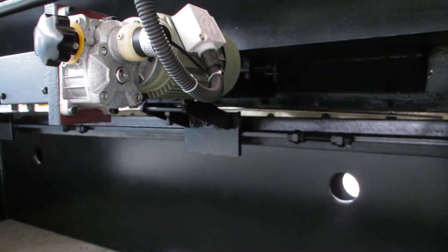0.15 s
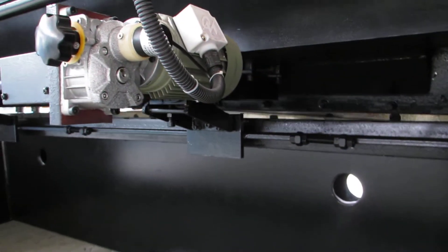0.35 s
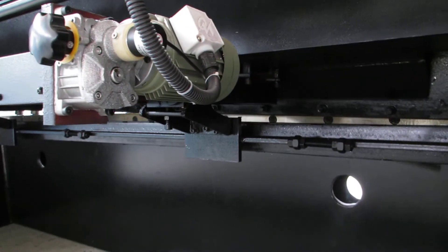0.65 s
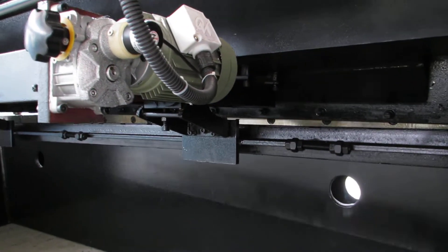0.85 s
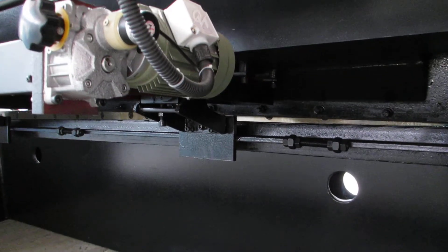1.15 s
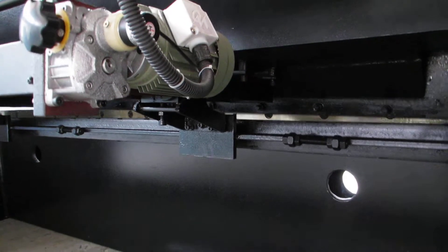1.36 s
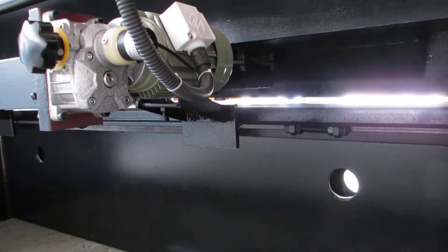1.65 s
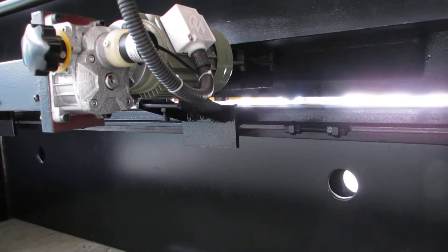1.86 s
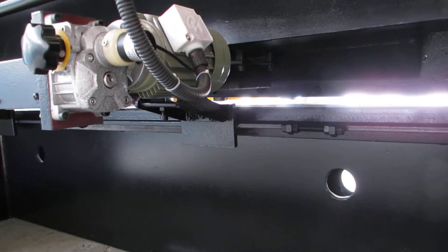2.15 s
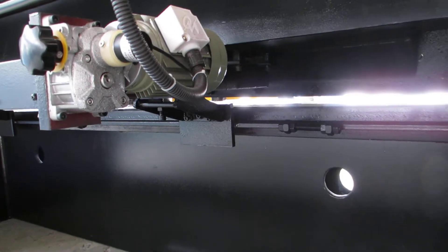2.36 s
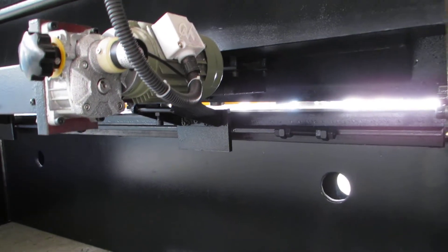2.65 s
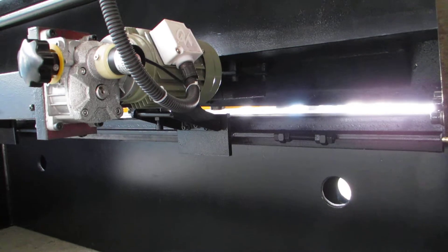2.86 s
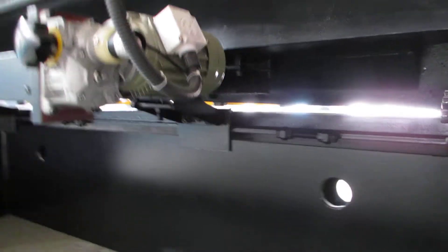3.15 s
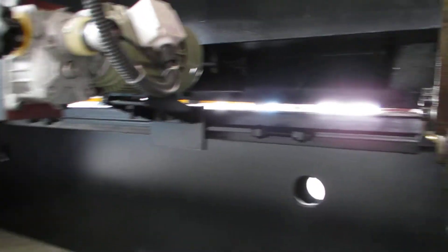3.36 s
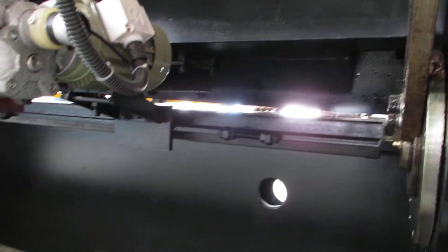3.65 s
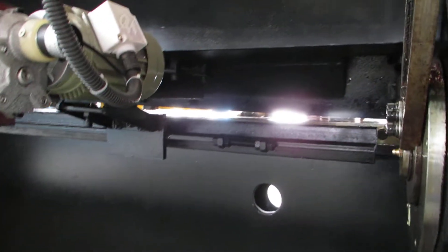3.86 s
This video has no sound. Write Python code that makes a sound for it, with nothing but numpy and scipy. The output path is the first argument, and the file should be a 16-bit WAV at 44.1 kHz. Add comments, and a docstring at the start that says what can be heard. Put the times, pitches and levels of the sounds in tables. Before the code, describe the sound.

A hydraulic shear whines over a heavy rumble with crisp ticks, breaks through with a thud, then the cut metal strip clangs and rattles in a chute; a faint motor hum remains in the hall, close stereo microphone.

```python
"""A hydraulic shear finishes its stroke. First the pump whines (wavering tones) over a heavy rumble and
a hiss (shaped noise), and the blade ticks through the sheet in short noise bursts. It breaks out with
a thud (ringing frame modes and dull noise). Then the cut strip falls, clangs (bending modes) and rattles
in the chute (noise and small clicks). The idling motor, there all along as a stack of shaft tones in
soft noise, is left humming in the hall."""
import sys
import numpy as np
from scipy import signal
from scipy.fft import rfft, irfft
from scipy.io import wavfile
from scipy.ndimage import uniform_filter1d

SR = 44100
rng = np.random.default_rng(int(sys.argv[2]) if len(sys.argv) > 2 else 0)


def generate_wav(sig):
    """Save sig (samples, or channels by samples) to the path in sys.argv[1] as 16-bit PCM at SR."""
    pcm = np.round(np.clip(np.atleast_2d(sig).T, -1, 1) * 32767).astype(np.int16)
    wavfile.write(sys.argv[1], SR, pcm)


def volts_from_decibels(level):
    """Turn decibel levels (scalar or array-like) into linear amplitude factors."""
    exponent = np.asarray(level, float) / 20
    return 10 ** exponent


N = 176400  # samples: 4 s

# A "t60" is the time in which a sound dies by 60 dB. Levels in spectra and mode lists are relative.
# Loaded pump over time: time_s, whine_db, rumble_db, cutting_hiss_db
PUMP_LOAD = [(0, -13.5, -17.5, -36.5), (.31, -12.5, -17.5, -31), (.42, -17, -19.5, -35.5),
             (.7, -17.5, -18.5, -24.5), (.86, -31, -24.5, -40), (1.02, -32, -27.5, -49.5)]
# Tones of the pump whine: multiple of the whine pitch, level_db
WHINE_TONES = [(1, -4), (1.073, -17.5), (1.348, -20)]
# Spectrum of the rumble in the frame: pitch_hz, level_db (per Hz)
RUMBLE_SPECTRUM = [(30, -38), (105, -2.5), (160, -8), (240, -2), (480, -13.5), (640, -8), (900, -15),
                   (1800, -23.5), (6000, -57)]
# Spectrum of the cutting hiss and the ticks: pitch_hz, level_db (per Hz)
HISS_SPECTRUM = [(1200, -7.5), (2500, -12), (6500, -11), (11500, -26.5), (15100, -53)]
# Blade ticks: start_s, level_db
BLADE_TICKS = [(0.2793, -26), (0.3177, -20), (0.3565, -21), (0.6405, -19.5), (0.7094, -16.5), (0.914, -33)]
# Thuds through the frame: start_s, level_db, spot_hz (modes near this pitch are struck hardest)
FRAME_THUDS = [(0.71, -14, 70), (0.749, -18.5, 146.7), (.79, -15, 135), (0.911, -26.5, 2315),
               (1.257, -29.5, 75), (1.297, -20.5, 398), (1.339, -18.5, 501), (1.389, -20, 261),
               (1.821, -37, 200)]
# Ringing modes of the frame: pitch_hz, level_db, t60_s
FRAME_MODES = [(52, 1, 0.039), (75, 0.5, 0.075), (133.6, 0, 0.47), (250.8, -0.5, 0.277), (581, -4.5, 0.081),
               (760, -17.5, .12)]
# Spectrum of the dull thump, before the struck spot tilts it: pitch_hz, level_db (per Hz)
THUMP_SPECTRUM = [(30, -3), (226, -7.5), (629, -12), (2500, -3.5), (7000, -60)]
# Blows of the falling strip: start_s, level_db, crack_db (mid-pitched part, on top of level_db), spot_hz
STRIP_BLOWS = [(1.0198, -17, 5.5, 4920), (1.0308, -13, -12, 9710), (1.048, -17.5, -13, 7340),
               (1.0892, -16.5, -14, 6406), (1.1591, -22, -18, 6111), (1.2043, -20.5, -15, 8457),
               (1.2406, -15.5, -10, 6406), (1.27, -17.5, -17, 6111), (1.3, -14, -7.5, 5730),
               (1.3341, -17.5, 1, 5202), (1.482, -25, -7, 2557), (1.499, -21.5, -2, 5802),
               (1.515, -21, -3, 4580), (1.5937, -20, -4, 6700), (1.631, -25, -7, 3830)]
# Bending modes of the strip: pitch_hz
STRIP_MODES = [2557, 3634, 3885, 4365, 4650, 4920, 5202, 5490, 5802, 6111, 6406, 6725, 7038, 7340, 7525,
               7690, 7990, 8323, 8457, 8800, 9088, 9420, 9747, 10082, 10550, 10760, 11150]
# Ringing time of the strip modes: pitch_hz, t60_s
STRIP_RING = [(2500, .4), (5000, .33), (12000, .16)]
# Spectrum of the dense chute modes, which also sets the strip modes: pitch_hz, level_db (per Hz)
CRASH_SPECTRUM = [(500, -25.5), (1200, -6), (2770, -11.5), (6900, -3.5), (11000, -10.5), (12800, -18),
                  (15100, -84.5)]
# Dying time of the chute crash: pitch_hz, t60_s
CRASH_RING = [(800, .14), (4000, .33), (12000, .1)]
# Idling motor over time: time_s, level_db
MOTOR_LEVEL = [(2.2, -42), (4, -36)]
# Strength of each shaft order, from the lowest one heard upward: level_db
SHAFT_ORDERS = [-43.5, -42.5, -45.5, -40.5, -52, -42.5, -60.5, -68, -44.5, -45.5, -43.5, -48.5, -57, -47,
                -52.5, -44.5, -47.5, -47.5, -46, -58, -50.5, -53, -57.5, -58, -49.5, -55, -47.5, -56, -61,
                -46, -53, -57.5, -49.5, -55, -44.5]
# Spectrum of the roar of fan and oil: pitch_hz, level_db (per Hz)
AIR_SPECTRUM = [(60, -11), (240, -5), (415, -10.5), (1200, -9.5), (7280, -36.5), (12000, -54)]
# How alike left and right are in the noises: pitch_hz, likeness (1 = the same)
LIKENESS = [(60, 0.987), (380, 0.99), (2350, 0.8764), (14700, 0.693)]
# Dying time of the hall: pitch_hz, t60_s
HALL_RING = [(300, 1), (8000, 0.42)]

WHINE_HZ, WHINE_STOP_S, WHINE_T60_S = 637, 0.715, 0.24
WHINE_WAVER_DB = 2  # for the base tone; times the multiple for the others
TICK_T60_S = 0.19
FRAME_AWAY_DB = -10  # per octave away from the struck spot
THUMP_T60_S, THUMP_DB = 0.53, -2  # the time is for a spot at the lowest frame mode
SPOT_SPREAD_DB, STRIP_AWAY_DB = 3, -3  # random spread per mode; drop per octave away from the spot
FIRST_EXTRA_DB, REST_EXTRA_DB = 1, 10  # extra for the struck mode: at the first blow, at rest
WIDE_DB, CRASH_DB = -11, -2.5  # left-right difference and chute crash, against the strip modes
SPLIT_HZ, CRACK_T60_S = 3400, 0.17
CHATTER_PER_S, CHATTER_DB, CHATTER_FADE_S, CLICK_T60_S = 980, -5.5, 0.045, 0.011
REST_S, REST_T60_S = 1.72, 0.09  # the strip lies flat and its ringing is damped
SHAFT_HZ, FIRST_ORDER = 24.97, 10
SHAFT_DB, SHAFT_WAVER_DB, AIR_DB = 3, 1.5, 1
HALL_DB = -10
MIC_LOW_HZ, MIC_TOP_HZ, RIGHT_DB = 47.5, 14000, 0.45


def evened(x):
    """Scales to an rms (average strength) of 1."""
    return x / np.sqrt(np.mean(x ** 2) + 1e-20)


def peaked(x):
    """Scales so that the first 10 ms have rms 1."""
    return x / np.sqrt(np.mean(x[..., :SR // 100] ** 2))


def read(points, hz):
    """Reads a table between its points, on a log-frequency axis."""
    f, value = np.transpose(points)
    return np.interp(np.log(hz + 1), np.log(f + 1), value)


def curve(table, column):
    """One column of a table over time, as a value per sample."""
    points = np.array(table)
    return np.interp(np.arange(N) / SR, points[:, 0], points[:, column])


def slow(top_hz, count=1):
    """Slow random drifts with nothing faster than top_hz, rms 1."""
    hop = SR // 100
    frames = N // hop + 2
    z = rfft(rng.standard_normal((count, frames)))
    z[:, np.fft.rfftfreq(frames, hop / SR) > top_hz] = 0
    drifts = evened(irfft(z, frames))
    return np.array([np.interp(np.arange(N) / hop, np.arange(frames), v) for v in drifts])


def noise(spectrum, patchy_db, size=1024, count=N, t60=None):
    """Stereo noise from random short-time spectra with patches; t60 by band makes it a dying burst."""
    hop = size // 4
    frames, hz = count // hop + 5, np.fft.rfftfreq(size, 1 / SR)
    a, b, c, d, patch = rng.standard_normal((frames, len(hz), 5)).T
    patch = uniform_filter1d(patch, size=8, axis=0)
    patch = evened(uniform_filter1d(patch, size=10, axis=1))
    same = np.clip(read(LIKENESS, hz), -1, 1)[:, None]
    left, other = a + 1j * b, c + 1j * d
    z = np.array([left, same * left + np.sqrt(1 - same ** 2) * other])
    z *= volts_from_decibels(read(spectrum, hz)[:, None] + patchy_db * patch)
    if t60:
        band_t60 = np.maximum(read(t60, hz), .01)[:, None]
        z *= volts_from_decibels(-60 * np.arange(frames) * hop / SR / band_t60)
    return signal.istft(z, nperseg=size, noverlap=size - hop)[1][:, :count]


def modes_of(hz, t60, seconds):
    """Dying complex oscillations, one column per mode."""
    t = np.arange(round(seconds * SR))[:, None] / SR
    return np.exp((2j * np.pi * hz - np.log(1000) / t60) * t)


def ring(modes, db):
    """Strikes the modes with these strengths and random phases."""
    strike = volts_from_decibels(db) * np.exp(2j * np.pi * rng.random(len(db)))
    return peaked((modes @ strike).real)


def add(mix, s, sound):
    """Mixes a sound in at time s, cut off at the end of the mix."""
    part = mix[:, round(s * SR):][:, :sound.shape[-1]]
    part += sound[..., :part.shape[1]]


def pump():
    """Whine that dies when the blade breaks through, rumble in the frame, cutting hiss."""
    t = np.arange(N) / SR
    stop_db = -60 * np.maximum(t - WHINE_STOP_S, 0) / WHINE_T60_S
    waver = slow(top_hz=24.4, count=len(WHINE_TONES))
    whine = np.zeros(N)
    for (k, db), w in zip(WHINE_TONES, waver[::-1]):
        # the same drift sways the level and, slightly, the phase
        tone = np.sin(2 * np.pi * k * WHINE_HZ * t + 0.075 * k * w)
        whine += volts_from_decibels(db + WHINE_WAVER_DB * k * w) * np.sqrt(2) * tone
    rumble = evened(noise(RUMBLE_SPECTRUM, patchy_db=2, size=2048))
    hiss = evened(noise(HISS_SPECTRUM, patchy_db=2.5, size=256))
    whine = volts_from_decibels(curve(PUMP_LOAD, column=1) + stop_db) * whine
    rumble = volts_from_decibels(curve(PUMP_LOAD, column=2)) * rumble
    hiss = volts_from_decibels(curve(PUMP_LOAD, column=3)) * hiss
    out_db = -400 * np.maximum(t - PUMP_LOAD[-1][0], 0)  # quick fade after the last table row
    return volts_from_decibels(out_db) * (whine + rumble + hiss)


def ticks():
    """Short bright noise bursts as the sheet gives way under the blade."""
    out = np.zeros((2, N))
    t = np.arange(SR // 6) / SR
    for s, db in BLADE_TICKS:
        burst = evened(noise(HISS_SPECTRUM, patchy_db=-0.5, size=256, count=len(t)))
        onset = np.minimum(t / 0.00067, 1)
        add(out, s, volts_from_decibels(db - 60 * t / TICK_T60_S) * onset * burst)
    return out


def thuds():
    """Blows into the frame: modes near the struck spot and a dull thump, shorter the higher the spot."""
    out, (hz, db, t60) = np.zeros((2, N)), np.transpose(FRAME_MODES)
    frame = modes_of(hz, t60, seconds=.5)
    t = np.arange(len(frame)) / SR
    for s, level_db, spot_hz in FRAME_THUDS:
        strike = volts_from_decibels(db + FRAME_AWAY_DB * abs(np.log2(hz / spot_hz)))
        modes = peaked((frame @ strike).imag)
        colour = [(f, g + FRAME_AWAY_DB * abs(np.log2(f / spot_hz))) for f, g in THUMP_SPECTRUM]
        thump = evened(noise(colour, patchy_db=-0.5, size=1024, count=len(t)))
        thump_t60 = THUMP_T60_S * np.cbrt(hz.min() / spot_hz)
        thump = thump * volts_from_decibels(THUMP_DB - 60 * t / thump_t60)
        onset = np.minimum(t / .002, 1)
        add(out, s, volts_from_decibels(level_db) * (modes + onset * thump))
    return out


def strip():
    """Each blow strikes the strip's modes at a spot and shakes the chute; edges chatter in small clicks."""
    out, hz = np.zeros((2, N)), np.array(STRIP_MODES)
    modes = modes_of(hz, read(STRIP_RING, hz), seconds=.35)
    t = np.arange(len(modes)) / SR
    t_chatter = np.arange(SR // 8) / SR
    low = signal.butter(2, SPLIT_HZ, fs=SR, output="sos")
    for s, level_db, crack_db, spot_hz in STRIP_BLOWS:
        db = read(CRASH_SPECTRUM, hz) + STRIP_AWAY_DB * abs(np.log2(hz / spot_hz))
        db += SPOT_SPREAD_DB * rng.standard_normal(len(hz))
        # the struck mode stands out more as the strip settles
        extra_db = np.interp(s, (STRIP_BLOWS[0][0], REST_S), (FIRST_EXTRA_DB, REST_EXTRA_DB))
        db[np.argmin(abs(hz - spot_hz))] += extra_db
        mid, side = ring(modes, db), ring(modes, db)
        crash = peaked(noise(CRASH_SPECTRUM, patchy_db=0.0, size=256, count=len(t), t60=CRASH_RING))
        body = mid + volts_from_decibels(WIDE_DB) * np.array([side, -side]) + volts_from_decibels(CRASH_DB) * crash
        under = signal.sosfilt(low, body)
        bright = peaked(body - under)
        crack = peaked(under) * volts_from_decibels(crack_db - 60 * t / CRACK_T60_S)
        # chatter: clicks at random moments and strengths, thinning out in level
        struck = rng.random(len(t_chatter)) < CHATTER_PER_S / SR
        strength = rng.standard_normal(len(t_chatter)) * np.exp(-t_chatter / CHATTER_FADE_S)
        chatter = volts_from_decibels(CHATTER_DB) * struck * strength
        click = bright[:, :len(t_chatter)] * volts_from_decibels(-60 * t_chatter / CLICK_T60_S)
        add(out, s, volts_from_decibels(level_db) * signal.fftconvolve(click, chatter[None], axes=1))
        onset = np.minimum(t / .002, 1)
        add(out, s, volts_from_decibels(level_db) * onset * (bright + crack))
    rest_db = -60 * np.maximum(np.arange(N) / SR - REST_S, 0) / REST_T60_S
    return out * volts_from_decibels(rest_db)


def motor():
    """Wavering tones at whole multiples (orders) of the shaft speed, in the roar of fan and oil."""
    t = np.arange(N) / SR
    order, db = FIRST_ORDER + np.arange(len(SHAFT_ORDERS))[:, None], np.array(SHAFT_ORDERS)[:, None]
    waver = slow(top_hz=9.4, count=len(order))
    turns = SHAFT_HZ * order * t + rng.random((len(order), 1))
    tones = np.sin(2 * np.pi * turns + 0.17 * waver[::-1])
    hum = evened((volts_from_decibels(db + SHAFT_WAVER_DB * waver) * tones).sum(0))
    air = evened(noise(AIR_SPECTRUM, patchy_db=0.5))
    return volts_from_decibels(curve(MOTOR_LEVEL, column=1)) * (volts_from_decibels(SHAFT_DB) * hum + volts_from_decibels(AIR_DB) * air)


def hall(x):
    """Diffuse tail of dying noise, each band dying at its own speed."""
    flat = [(20, 0), (20000, 0)]
    tail = noise(flat, patchy_db=0, size=256, count=SR, t60=HALL_RING)
    tail[:, :SR // 100] = 0  # the first 10 ms stay silent
    return signal.fftconvolve(x, tail / np.linalg.norm(tail[0]), axes=1)[:, :N]


def scene():
    """All sources together; the ticks, thuds and strip blows also fill the hall."""
    blows = ticks() + thuds() + strip()
    return pump() + motor() + blows + volts_from_decibels(HALL_DB) * hall(blows)


def band_limit(x):
    """A steep low-pass at the top of the band."""
    return signal.sosfilt(signal.butter(12, 15270, fs=SR, output="sos"), x)


def record(dry):
    """A microphone deaf to deep bass and top treble, slightly louder on the right."""
    band = signal.butter(4, [MIC_LOW_HZ, MIC_TOP_HZ], "band", fs=SR, output="sos")
    heard = signal.sosfilt(band, dry)
    mix = heard * volts_from_decibels(np.array([[0], [RIGHT_DB]]))
    return band_limit(mix)


dry = scene()
out = record(dry)
generate_wav(out)
```